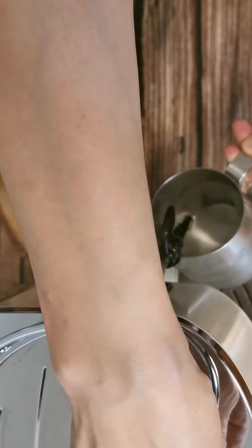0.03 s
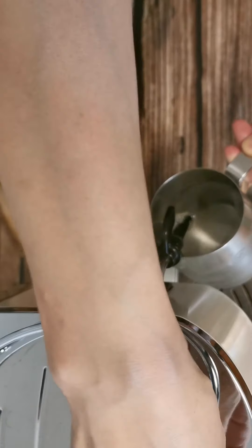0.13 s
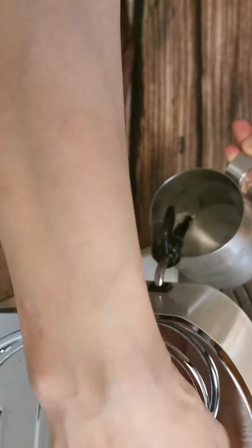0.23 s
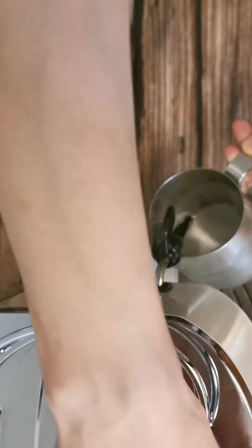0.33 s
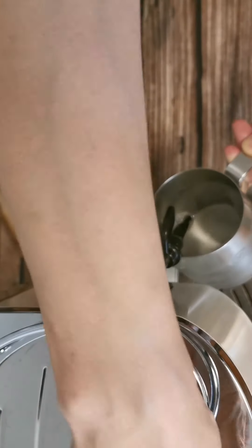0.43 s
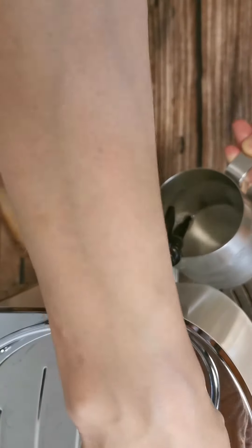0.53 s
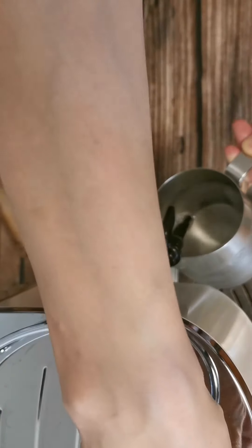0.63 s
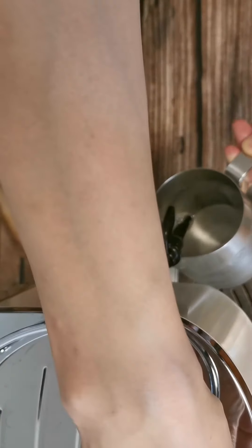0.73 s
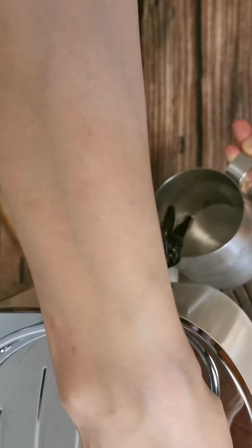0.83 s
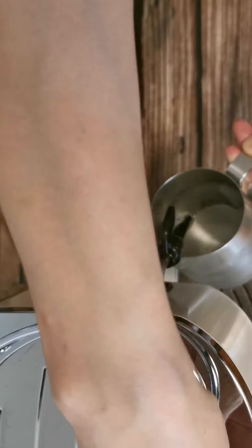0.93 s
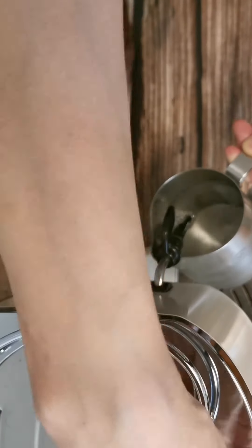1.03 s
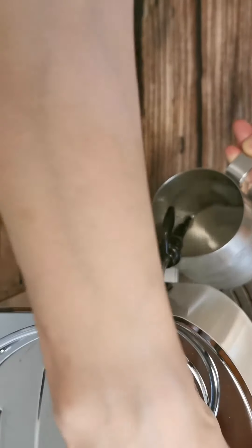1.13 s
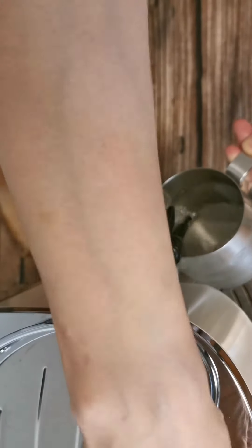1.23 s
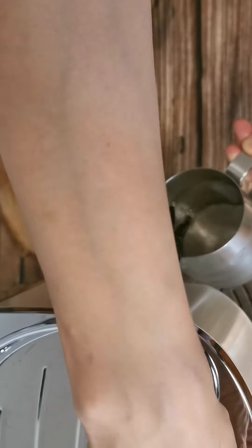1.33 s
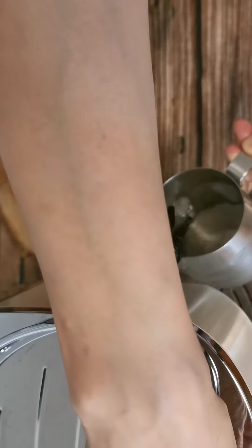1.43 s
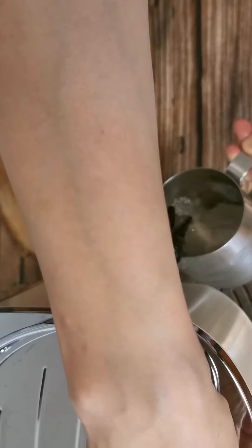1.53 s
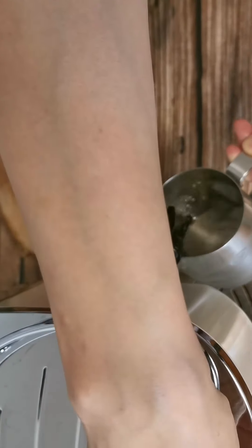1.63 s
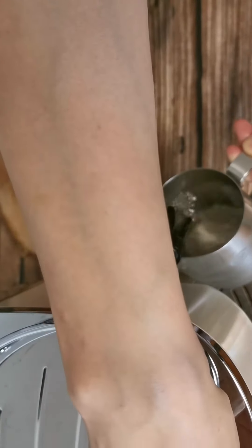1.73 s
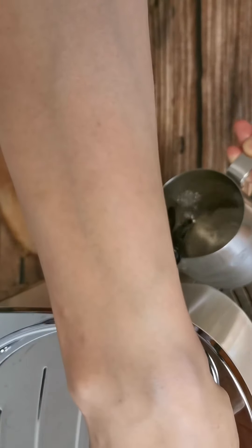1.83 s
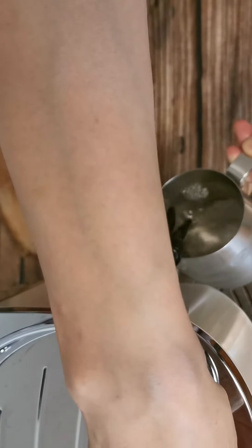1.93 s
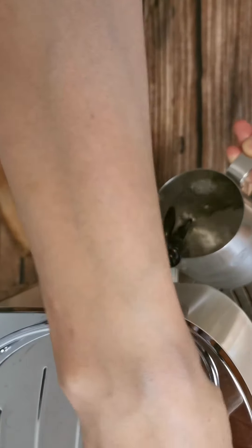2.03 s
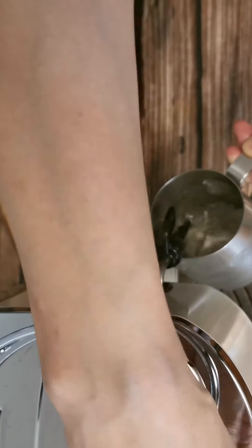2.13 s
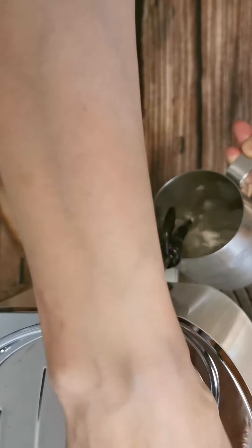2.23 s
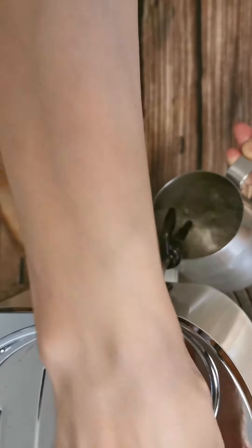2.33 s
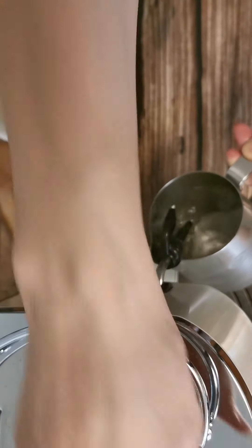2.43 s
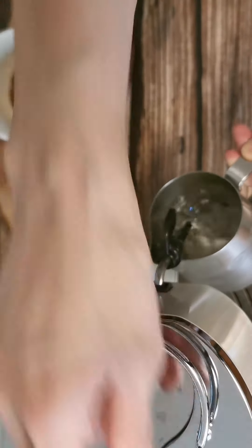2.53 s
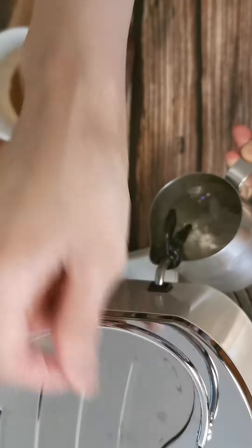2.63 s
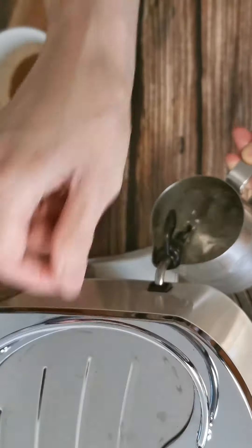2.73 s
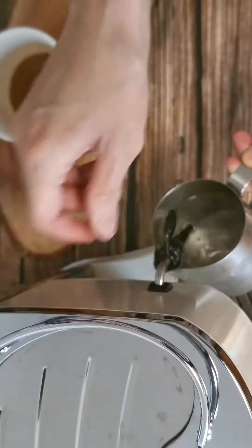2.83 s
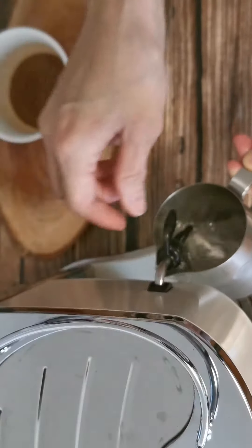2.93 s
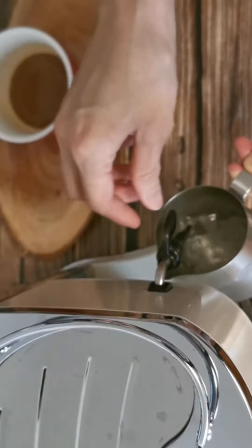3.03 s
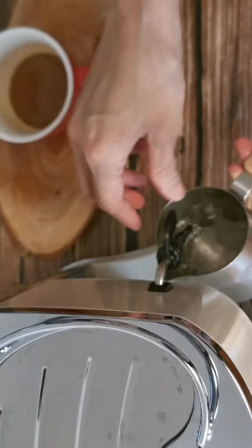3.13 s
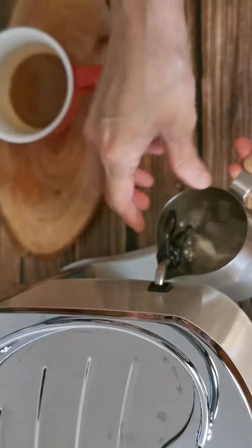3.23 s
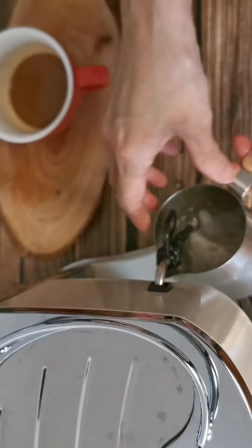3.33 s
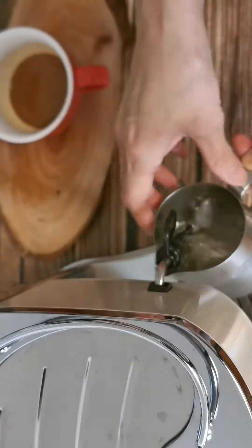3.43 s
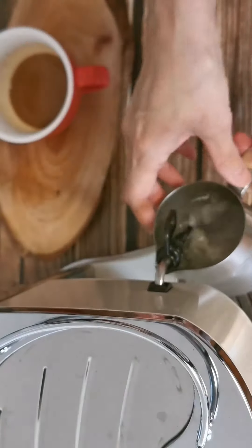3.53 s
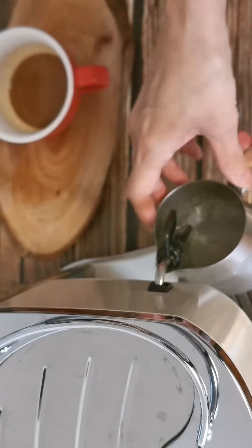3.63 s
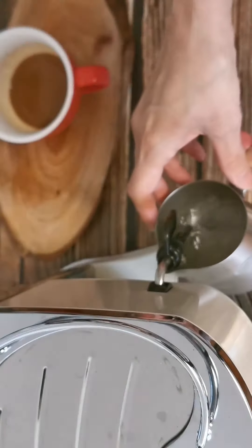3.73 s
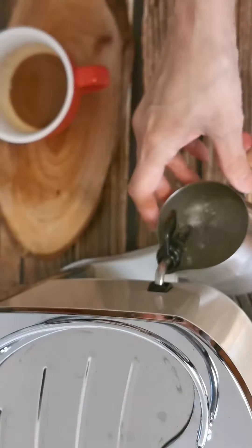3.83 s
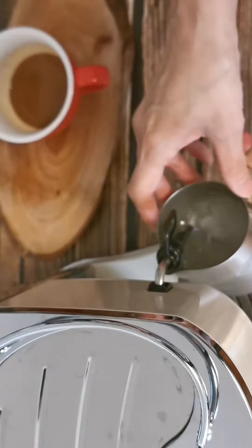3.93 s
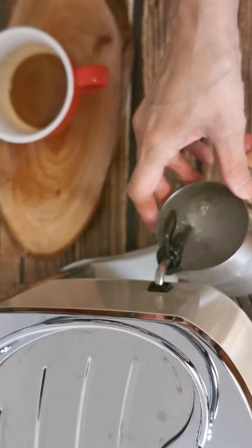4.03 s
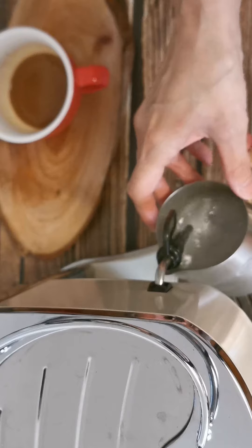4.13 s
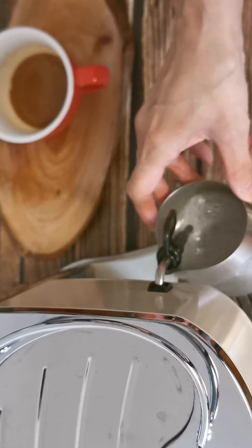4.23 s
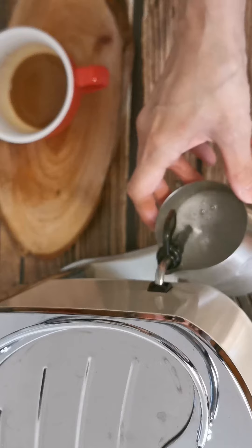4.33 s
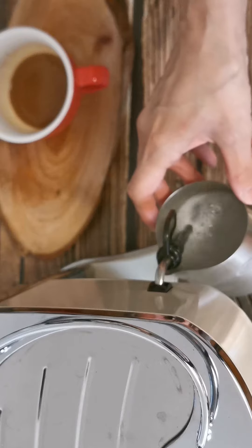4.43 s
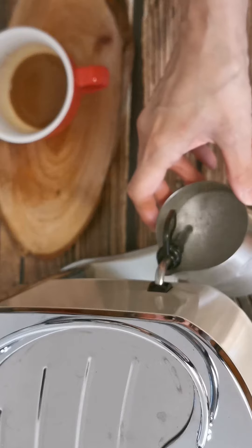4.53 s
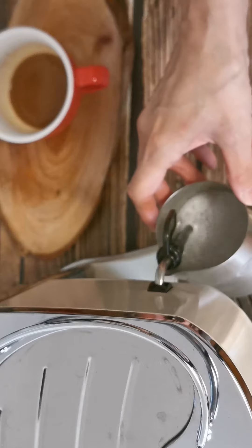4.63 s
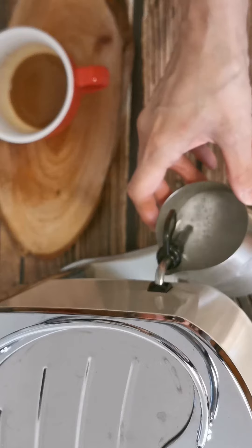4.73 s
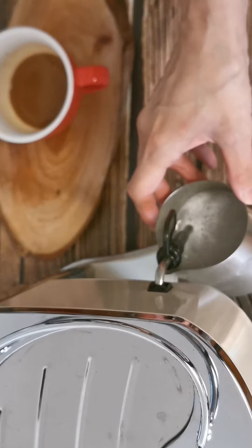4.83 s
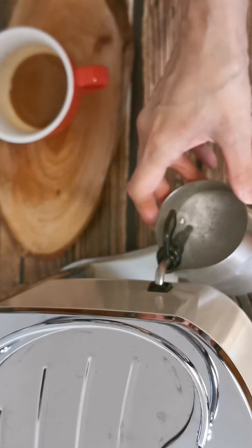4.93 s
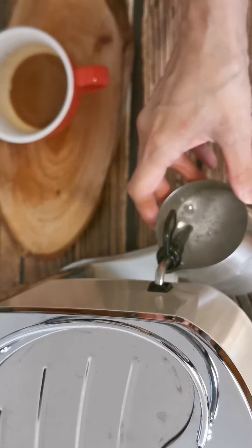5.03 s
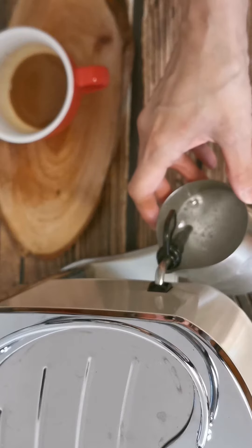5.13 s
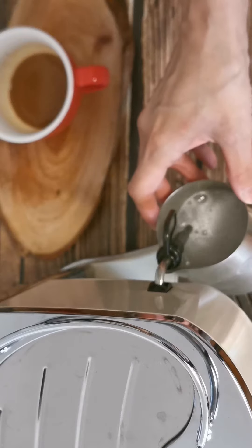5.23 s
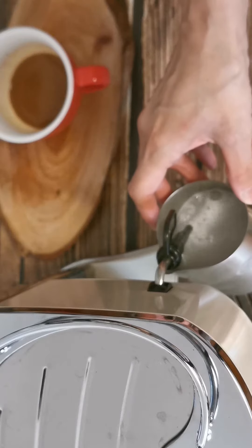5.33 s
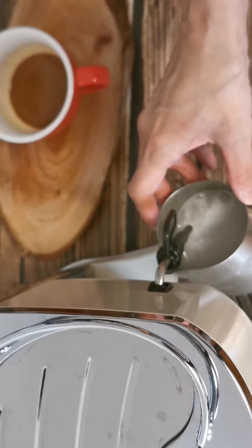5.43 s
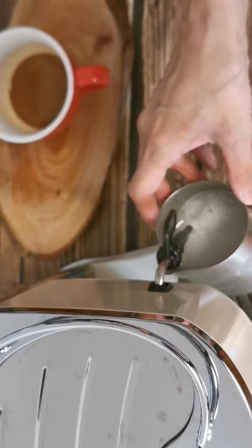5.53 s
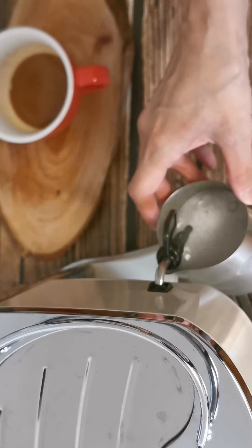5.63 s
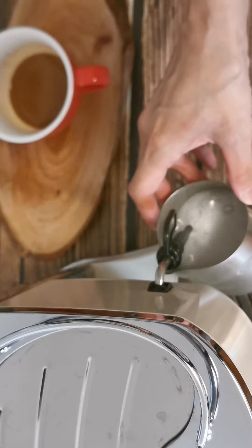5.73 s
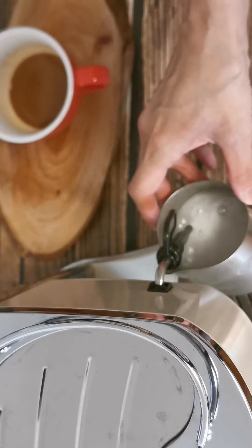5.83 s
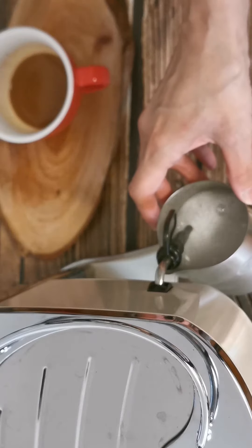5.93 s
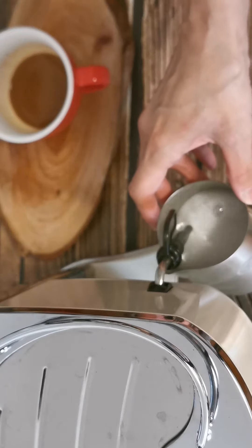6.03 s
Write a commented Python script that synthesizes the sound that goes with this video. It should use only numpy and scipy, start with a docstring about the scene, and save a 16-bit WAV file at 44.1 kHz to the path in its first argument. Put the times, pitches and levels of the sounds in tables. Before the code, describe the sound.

Close stereo sound in a kitchen, with faint low rumble and liquid burble behind. At 0.1 s a steam wand opens into a steel pitcher: a rising gurgle, a sizzle of drops and hollow roaring air until about 1 s, under continuous crackling, metallic-coloured hiss. From 0.4 s a thin squeal climbs, ragged at first, settling near 3 kHz by 2 s and clearest from 2.3 to 3.1 s, with a fuzzy higher whistle. Small bubbles fizz and pop around 1.4-2 s and occasionally later; drops sizzle near 1.9 and 3.3 s. The squeal dies by 3.9 s. From 4 to 4.4 s come gulps, a falling slurp, hollow spits and a brief hoot. At 4.4 s the tip sinks: the hiss dulls beneath a growing boiling rattle, with bright ringing pops densest at 4.9-5.2 s. Around 5.5 s it surfaces abruptly, and fluttering hiss continues with short airy slurps to the end, about 6.1 s.

```python
"""A steam wand blowing into a little liquid in a steel pitcher, miked close by in a kitchen, in stereo.
The jet is crackling noise in the colour of the pitcher; its squeal, noise in a narrow resonance, climbs
as the liquid warms. At the surface the tip gulps air and spits: swept noise and sagging thumps.
Sunk deep, the hiss gives way to the rattle of collapsing steam bubbles: short rings and a broad boil.
Low burble, rumble and faint air lie behind; two microphone ports hear it all with short reflections."""
import sys
import numpy as np
from scipy import signal
from scipy.fft import rfft, irfft
from scipy.io import wavfile
from scipy.ndimage import uniform_filter1d

SR = 44100
rng = np.random.default_rng(int(sys.argv[2]) if len(sys.argv) > 2 else 0)


def master_out(mix):
    """Clip the mix to full scale and print it as 16-bit PCM to the path in sys.argv[1]."""
    frames = np.transpose(np.atleast_2d(mix))
    ceiling = np.clip(frames, -1, 1)
    pcm = np.round(ceiling * 32767).astype(np.int16)
    wavfile.write(sys.argv[1], SR, pcm)


N = 268304
TIME = np.arange(N) / SR
HZ = np.fft.rfftfreq(N, 1 / SR)

VALVE_OPENS = 0.093  # s
HOLLOW_HZ = 1250  # the hollow in the liquid around the tip, at rest
# the tip is sunk deep once: it goes under, stays, and comes up again (s)
DIVE_AT, SINK_S, SURFACES_AT, LIFT_S = 4.42, 0.096, 5.54, 0.06


def gain_of(db):
    """Decibels to a factor."""
    return 10 ** (np.asarray(db) / 20)


def evened(x):
    """Scales to rms 1."""
    return x / np.sqrt(np.mean(x ** 2) + 1e-20)


def read(points, hz):
    """A spectrum table joined by straight lines on a log axis."""
    f, value = np.transpose(points)
    return np.interp(np.log(hz + 1), np.log(f + 1), value)


def follow(rows):
    """The columns of a curve table, sample by sample."""
    s, *columns = np.transpose(rows)
    return [np.interp(TIME, s, c) for c in columns]


def during(rows, fade=0.045):
    """1 over the span of a curve table, fading out beyond it."""
    return np.clip(1 + np.minimum(TIME - rows[0][0], rows[-1][0] - TIME) / fade, 0, 1)


def held(start, end, attack, release):
    """1 from start to end, with a straight rise before and a straight fall after."""
    return np.clip(1 + np.minimum((TIME - start) / attack, (end - TIME) / release), 0, 1)


def burst(s, length):
    """A smooth swell of height 1 around the moment s."""
    return np.exp(-np.minimum((2 * (TIME - s) / length) ** 2, 50))


def coloured(x, db):
    """Filters by a gain in dB on the axis HZ; rms 1."""
    return evened(irfft(rfft(x) * gain_of(db), N))


def above(x, hz):
    """A steep high-pass."""
    return signal.sosfilt(signal.butter(6, hz, "highpass", fs=SR, output="sos"), x)


def wander(rate):
    """Slow chance, up to about rate changes a second; rms 1."""
    return evened(irfft(rfft(rng.standard_normal(N)) / (1 + (HZ / rate) ** 2), N))


def crackle(per_s, spread_db, share):
    """Tiny bursts of uneven size, holding a share of the power, in smooth turbulence."""
    sizes = gain_of(spread_db * np.minimum(rng.exponential(1, N), 5))
    clicks = sizes * rng.choice([-1, 1], N) * (rng.random(N) < per_s / SR)
    share = np.clip(share, 0, 1)
    return np.sqrt(share) * evened(clicks) + np.sqrt(1 - share) * rng.standard_normal(N)


def resonate(x, hz, width):
    """A steep resonance (two equal poles) that follows the pitch hz; rms 1."""
    turn = np.exp(2j * np.pi * np.cumsum(hz * np.ones(len(x))) / SR)
    r = np.exp(-np.pi * width / SR)
    # turn the pitch down to 0 Hz, smooth there, and turn back
    smoothed = signal.lfilter([1], [1, -2 * r, r * r], x / turn)
    return evened((turn * smoothed).real)


def depth():
    """How far the tip is sunk: 0 at the surface, 1 deep."""
    return held(DIVE_AT + SINK_S, SURFACES_AT - LIFT_S, SINK_S, LIFT_S)


# low burble of the liquid, relative spectrum: f/Hz, level/dB
BURBLE_SPECTRUM = [(90, -2), (160, 9), (230, 2), (330, -13), (480, -5.5), (800, -17), (1600, -11.5)]
# the kitchen's low background, relative spectrum: f/Hz, level/dB
ROOM_RUMBLE = [(12, -27), (20, -3.5), (41, 6), (70, -9), (92, 1), (200, -9.5), (260, -87), (440, -120)]
# dips of the rumble and burble: start t/s, end t/s, level change/dB
QUIET_SPELLS = [(0.107, 0.643, -4.5), (2.298, 2.554, -1), (3.152, 4.517, -7), (3.616, 3.67, -24),
                (4.01, 4.4, -6), (4.179, 4.318, -18), (5.952, 5.994, -24)]


def low_sounds(burble_db=-72, deep_db=-65, uneven_db=6.0, rumble_db=-63, swell_db=4.5, air_db=-76):
    """The liquid burbles unevenly, more with the tip deep, over the kitchen's low background and faint air."""
    burble = coloured(crackle(per_s=150, spread_db=-0.5, share=0.17), read(BURBLE_SPECTRUM, HZ))
    swirl = gain_of(burble_db + uneven_db * np.minimum(wander(25), 1.5)) + gain_of(deep_db) * depth()
    rumble = coloured(rng.standard_normal(N), read(ROOM_RUMBLE, HZ))
    rumble = rumble * gain_of(rumble_db + swell_db * wander(19.0))
    air_spectrum = read([(900, -24.0), (2200, 57), (4000, -3), (15000, -71)], HZ)
    air = coloured(rng.standard_normal(N), air_spectrum)
    lull_db = sum(db * held(start, end, attack=0.05, release=0.037) for start, end, db in QUIET_SPELLS)
    return gain_of(lull_db) * (swirl * burble + rumble) + gain_of(air_db) * air


# swirling liquid, each surge swelling and breaking off: start t/s, end t/s, level/dB, centre f/Hz
LIQUID_SURGES = [(0.08, 0.089, -54, 330), (1.825, 1.93, -56.5, 217), (2.627, 2.886, -69.5, 187),
                 (2.93, 3.037, -54.5, 263), (5.258, 5.303, -56.5, 238), (5.63, 5.66, -69, 361.6)]


def surges(swell_s=0.062, stop_s=0.021, glug_db=1.5, slosh=0.18):
    """Now and then the liquid heaves against the wall in a low, lumpy run of glugs."""
    drive = crackle(per_s=130, spread_db=0.5, share=0.8) * gain_of(glug_db * np.minimum(wander(41), 2))
    waver = np.exp(slosh * wander(30))
    out = np.zeros(N)
    for start, end, db, hz in LIQUID_SURGES:
        glugs = resonate(drive, hz * waver, width=80)
        out += gain_of(db) * held(start, end, swell_s, stop_s) * glugs
    return out


def first_gurgle(start_hz=400, climb_octaves_per_s=7.1, s=0.24, length=0.36, level_db=-53, slosh=0.13):
    """The first steam digs a deep hollow, whose pitch climbs as the liquid closes in."""
    hz = np.minimum(start_hz * 2 ** (climb_octaves_per_s * (TIME - VALVE_OPENS)), HOLLOW_HZ)
    gurgle = resonate(rng.standard_normal(N), hz * (1 + slosh * wander(40)), width=260)
    return gain_of(level_db) * burst(s, length) * gurgle * (TIME > VALVE_OPENS)


# drops in the jet, at the tip: centre t/s, length t/s, f/Hz, level/dB
DROP_SIZZLES = [(0.2, 0.037, 6860, -34), (0.28, 0.14, 6850, -50), (1.865, 0.25, 4840, -35),
                (3.295, 0.59, 7350, -38.5), (3.613, 0.18, 6880, -43), (5.858, 0.27, 7700, -39.5)]


def sizzles(width=1000):
    """Drops caught in the jet fizz away as resonant noise, the first of them water left in the wand."""
    drive = rng.standard_normal(N)
    return sum(gain_of(db) * burst(s, length) * resonate(drive, hz, width)
               for s, length, hz, db in DROP_SIZZLES)


# draughts of air pulled in at the surface: start t/s, end t/s, roar level/dB
AIR_DRAUGHTS = [(0.115, 0.292, -39), (0.3, 0.4, -36), (0.41, 0.63, -43.5), (0.653, 1.005, -47.5),
                (3.82, 3.838, -47), (4.017, 4.2, -44), (4.21, 4.33, -44.5), (4.34, 4.42, -51),
                (4.632, 4.69, -44), (5.598, 5.639, -41), (5.77, 5.817, -45.5), (5.895, 5.956, -41.5),
                (6.066, 6.09, -42)]


def draughts(attack=0.026, release=0.022):
    """The strength of the air drawn in at the surface."""
    return np.max([gain_of(db) * held(start, end, attack, release)
                   for start, end, db in AIR_DRAUGHTS], axis=0)


# roar inside the pitcher, relative spectrum: f/Hz, level/dB
ROAR_SPECTRUM = [(200, -45), (400, -29.5), (750, -24), (900, -3.5), (1080, 2.5), (1230, 5.5), (1450, -8),
                 (1900, -39), (2600, -43), (4000, -77)]


def roar():
    """Air drawn in at the surface sounds the pitcher's lowest resonance."""
    air = crackle(per_s=900, spread_db=1.5, share=0.4) * gain_of(1.5 * np.minimum(wander(90), 1.5))
    return coloured(air, read(ROAR_SPECTRUM, HZ)) * draughts()


# slurps as the tip comes clear of the froth: start t/s, end t/s, first f/Hz, last f/Hz, level/dB
FROTH_SLURPS = [(3.978, 4.042, 1670, 840, -44), (4.634, 4.689, 1930, 1600, -46),
                (5.568, 5.6, 1750, 1190, -39), (5.756, 5.782, 1740, 1350, -41),
                (5.89, 5.931, 1600, 1250, -46), (6.054, 6.094, 1900, 1380, -42.5)]


def slurps(swell_s=0.022, fade_s=0.026):
    """A funnel opens in the froth: a soft, broad splutter that falls in pitch as it widens."""
    drive = crackle(per_s=1200, spread_db=1.5, share=0.6)
    out = np.zeros(N)
    for start, end, first_hz, last_hz, db in FROTH_SLURPS:
        hz = np.interp(TIME, [start, end], [first_hz, last_hz])
        out += gain_of(db) * held(start, end, swell_s, fade_s) * resonate(drive, hz, width=1100)
    return above(out, hz=875)


def hoot(start=4.33, end=4.475, level_db=-43.0, hz=1190, swell_s=0.025, fade_s=0.02):
    """Just before the tip goes under, the narrowing hollow holds one note."""
    note = resonate(rng.standard_normal(N), hz, width=90)
    note = evened(note / (abs(signal.hilbert(note)) + 0.3) ** 0.6)  # steadies its strength
    return gain_of(level_db) * held(start, end, swell_s, fade_s) * note


# gulps under the jet: centre t/s, length t/s, lowest f/Hz, level/dB
AIR_GULPS = [(4.075, 0.097, 342, -41), (4.253, 0.1, 496, -50)]
# their bubbling, relative spectrum: f/Hz, level/dB
GULP_SPECTRUM = [(200, -16), (340, -8), (800, 9), (1400, -2), (2000, -12), (3000, -35)]


def gulps(ring_db=-6, ring_s=0.026, glug_db=2.0, edge_hz=130, spread=0.99):
    """The hollow deepens and refills: rough bubbling reaches down to its pitch and rings at the deepest."""
    bubbling = crackle(per_s=500, spread_db=2.0, share=0.56)
    bubbling = bubbling * gain_of(glug_db * np.minimum(wander(80), 1.5))
    hz, t, z = signal.stft(coloured(bubbling, read(GULP_SPECTRUM, HZ)), SR, nperseg=1024)
    out = np.zeros(N)
    for s, length, low_hz, db in AIR_GULPS:
        lowest = np.interp(t, TIME, HOLLOW_HZ * (low_hz / HOLLOW_HZ) ** burst(s, 2 * length))
        passed = np.clip(1 + (hz[:, None] - lowest) / edge_hz, 0, 1)
        rush = signal.istft(z * passed, SR, nperseg=1024)[1][:N]
        ring = gain_of(ring_db) * burst(s, ring_s) * resonate(bubbling, low_hz, width=80)
        out += gain_of(db) * (burst(s, spread * length) * rush + ring)
    return above(out, hz=247)


# the jet leaving the pitcher, relative spectrum: f/Hz, level/dB
JET_SPECTRUM = [(250, -38.5), (600, -56), (780, -25), (950, -3.5), (1600, -1), (2300, 5.5), (4000, 3.5),
                (6100, 2), (7600, 3.5), (9800, 3), (12000, 2.5), (14300, 0), (15600, 1)]
# air resonances of the pitcher, untuned: f/Hz, width/Hz, lift/dB
PITCHER_RESONANCES = [(1180, 160, 7.5), (2600, 640, -10.5), (3188, 205, 9), (4920, 910, 6.5),
                      (7040, 185, 7), (8220, 140, 7.5), (9240, 210, 4.5), (10580, 560, 7),
                      (12060, 540, 2.5), (12700, 300, 5.5), (14200, 300, -2)]


def pitcher_db(hz, tuning=1):
    """The colour of the jet as it leaves the pitcher, whose resonances shift by the factor tuning."""
    lifts = sum(db / (1 + (2 * (hz - centre * tuning) / width) ** 2)
                for centre, width, db in PITCHER_RESONANCES)
    return read(JET_SPECTRUM, hz) + lifts


# spits at the surface: centre t/s, thump level/dB, thump f/Hz, relative spray level/dB, length t/s
SURFACE_SPITS = [(3.653, -76, 1210, -24, 0.019), (3.823, -36, 1167, -21, 0.009),
                 (3.982, -49, 1750, -28, 0.0055), (4.026, -30, 1074, -23, 0.028),
                 (4.067, -32, 1104, -24, 0.0078), (4.122, -36.5, 930, -24.5, 0.021),
                 (4.151, -32.5, 1130, -28, 0.015), (4.189, -26, 1092, -22, 0.0042),
                 (4.2, -38, 1090, -24, 0.013), (4.228, -41, 1090, -24.5, 0.013),
                 (4.27, -32, 1080, -17.5, 0.0025), (4.322, -31.5, 1140, -34, 0.007),
                 (4.379, -37, 1190, -27.5, 0.0098), (4.407, -30.5, 1183, -25, 0.014),
                 (4.419, -33, 1180, -39, 0.008)]


def spits(spray_db=-1, smear=0.69, sag_hz_per_s=7000):
    """The jet breaks the surface: a hollow, splashy thump that sags in pitch, and a puff of spray."""
    spray_colour = pitcher_db(HZ) + read([(2500, -27.5), (9000, -14)], HZ)
    spray = coloured(rng.standard_normal(N), spray_colour)
    splash = 0.35 * above(resonate(rng.standard_normal(N), HOLLOW_HZ, width=800), hz=750)
    drift, out = smear * wander(54), np.zeros(N)
    for s, db, hz, puff_db, length in SURFACE_SPITS:
        cycles = (hz - sag_hz_per_s * (TIME - s) / 2) * (TIME - s)
        thump = np.sqrt(2) * np.sin(2 * np.pi * cycles + drift) + splash
        out += burst(s, length) * (gain_of(db) * thump + gain_of(puff_db + spray_db) * spray)
    return out


# spells of small bubbles under the surface: start t/s, end t/s, build-up t/s, level/dB, nominal f/Hz
BUBBLE_FIZZLES = [(1.39, 1.743, 0.51, -39, 3180), (1.75, 2, 0.037, -37, 3245),
                  (2.758, 3.183, 0.059, -43.5, 3320), (3.454, 3.678, 0.24, -38.5, 3310),
                  (3.755, 3.772, 0.077, -32, 3230), (3.85, 3.94, 0.021, -36, 3290),
                  (4.511, 4.565, 0.016, -36, 3360), (4.763, 4.84, 0.089, -31.5, 3300)]
# the deep boil's rattle, relative spectrum: f/Hz, level/dB
BOIL_SPECTRUM = [(1000, -41.5), (2600, -17), (3100, -15), (3800, -3), (4800, 0), (5500, -1.5), (6200, -9.5),
                 (6850, -4.5), (7500, -14.5), (9000, -15.5), (11000, -41), (16000, -55)]
# brief stalls of the bubbles: centre t/s, length t/s, level change/dB
RATTLE_STALLS = [(4.754, 0.032, -4.5), (4.859, 0.035, -7), (4.954, 0.031, -4), (5.232, 0.013, -3),
                 (5.353, 0.034, -5.5)]


def bubbles(deep_ring_db=-36, peak_ring_db=-34, peak_s=5.12, peak_length=0.48, boil_db=-27.5,
            throb_db=3.0, drift=0.024, build_s=0.26, boil_stop_s=0.017, swelling=0.053):
    """Steam bubbles collapse under the surface: short rings, and a broad rattle while the tip is deep."""
    # at the deepest the bubbles grow and ring lower
    size = 1 + drift * wander(30) + swelling * burst(5.17, length=0.22)
    collapses = crackle(per_s=570, spread_db=0.7, share=0.5)
    fizzles = np.zeros(N)
    for start, end, build, db, hz in BUBBLE_FIZZLES:
        spell = held(start, end, build, release=0.088)
        fizzles += gain_of(db) * spell * resonate(collapses, hz / size, width=300)
    rings = resonate(collapses, 3270 / size, width=314)
    deep = depth() * held(DIVE_AT + SINK_S + build_s / 2, SURFACES_AT, build_s / 2, LIFT_S)
    ringing = gain_of(deep_ring_db) * deep + gain_of(peak_ring_db) * burst(peak_s, peak_length)
    rattle = coloured(crackle(per_s=3600, spread_db=3.0, share=0.47), read(BOIL_SPECTRUM, HZ))
    boiling = held(DIVE_AT + SINK_S / 2 + build_s, SURFACES_AT - LIFT_S, build_s, boil_stop_s)
    boiling = gain_of(boil_db) * boiling
    stall_db = sum(db * burst(s, length) for s, length, db in RATTLE_STALLS)
    unsteady = gain_of(stall_db + throb_db * np.minimum(wander(156), 2))
    return (fizzles + rings * ringing + rattle * boiling) * unsteady


# large bubbles and short sputters collapsing: centre t/s, level/dB, f/Hz, length t/s
BUBBLE_POPS = [(1.753, -29, 3110, 0.016), (1.931, -25, 3070, 0.0055), (1.948, -21, 3160, 0.0074),
               (1.957, -25, 3005, 0.0077), (2.331, -34, 3090, 0.017), (2.808, -32.5, 3550, 0.026),
               (2.867, -35, 3630, 0.026), (2.966, -30, 2925, 0.016), (3.398, -28.5, 3420, 0.024),
               (3.642, -30, 3350, 0.013), (3.78, -28, 3190, 0.011), (4.59, -26, 3355, 0.023),
               (4.883, -20.5, 3290, 0.0086), (4.925, -25, 3280, 0.011), (4.946, -23, 3260, 0.0056),
               (5.001, -20.5, 3280, 0.0079), (5.022, -21, 3220, 0.0079), (5.091, -20, 3170, 0.0084),
               (5.123, -21, 3440, 0.0099), (5.156, -23.5, 3225, 0.013), (5.168, -19.5, 3120, 0.0062),
               (5.392, -41, 3120, 0.0053)]


def pops(smear=0.87, ragged_s=0.067):
    """Each large bubble swells and dies as a short, unsteady ring; the longer ones break up into sputter."""
    drift, out = smear * wander(140), np.zeros(N)
    sputter = resonate(rng.standard_normal(N), 3300, width=750)
    for s, db, hz, length in BUBBLE_POPS:
        ragged = np.clip(length / ragged_s, 0, 0.8)
        tone = np.sin(2 * np.pi * hz * TIME + drift)
        ring = np.sqrt(2 * (1 - ragged)) * tone + np.sqrt(ragged) * sputter
        out += gain_of(db) * burst(s, length) * ring
    return out


# upper whistle of the steam pocket at the tip: t/s, mean f/Hz, level/dB, overtone level/dB
WHISTLE_PATH = [(0.3, 4300, -57, -70), (0.63, 4700, -58, -66), (0.8, 4980, -40, -60),
                (0.98, 4870, -41, -65), (1.12, 5230, -43, -53), (1.27, 5290, -43, -44),
                (1.52, 5620, -38, -39), (1.86, 5520, -39.5, -43.5), (2.02, 5685, -40.5, -40),
                (2.66, 5656, -41, -38.5), (3.0, 5630, -40.5, -38), (3.3, 5700, -42.5, -35),
                (3.56, 5790, -42, -35.5), (3.79, 5870, -44, -41)]


def whistle(top_db=-4, waver=0.0079):
    """The higher resonances of the steam pocket: a fuzzy whistle with two overtones."""
    hz, db, overtones_db = follow(WHISTLE_PATH)
    hz = hz * (1 + waver * wander(11))
    drive = crackle(per_s=1200, spread_db=2.5, share=0.58)
    lowest = resonate(drive, hz, width=280)
    overtones = resonate(drive, hz * 1.474, width=300)
    overtones = overtones + gain_of(top_db) * resonate(drive, hz * 1.96, width=640)
    mix = gain_of(db) * lowest + gain_of(overtones_db) * overtones
    return during(WHISTLE_PATH, fade=0.086) * mix


# squeal of the steam pocket at the tip, climbing as the liquid warms: t/s, mean f/Hz, level/dB
SQUEAL_PATH = [(0.3, 1510, -51.5), (0.42, 1930, -52), (0.5, 2070, -44), (0.66, 2250, -51.5),
               (0.78, 2560, -45), (0.87, 2540, -44), (0.96, 2430, -48), (1.05, 2570, -42),
               (1.14, 2640, -40), (1.28, 2770, -41), (1.47, 2890, -36), (1.64, 2910, -38),
               (1.84, 2780, -36), (2.0, 2946, -32.5), (2.22, 2930, -36), (2.36, 2930, -31),
               (2.48, 2920, -34.5), (2.57, 2920, -33), (2.73, 2936, -30.5), (2.8, 2950, -36.5),
               (2.95, 2950, -33.5), (3.16, 2920, -35), (3.28, 2940, -38), (3.56, 2950, -35.5),
               (3.79, 2990, -45)]
# how much of the squeal is one clear line: t/s, share/0-1
SQUEAL_CLEARNESS = [(0.4, .5), (0.8, .72), (1.15, .75), (1.4, .45), (2.05, .45), (2.3, .9), (3.15, .9),
                    (3.35, .5)]


def squeal(skirt_db=-11, falter_db=1.3, rough_hz=260):
    """Collapsing bubbles ring the steam pocket: a narrow note, ragged at times, over a broad skirt."""
    hz, db = follow(SQUEAL_PATH)
    hz = hz * (1 + 0.002 * wander(19))
    note = resonate(rng.standard_normal(N), hz, width=85)
    # the ring feeds back on the collapses, which steadies its strength
    note = evened(note / (abs(signal.hilbert(note)) + 0.2) ** 0.75)
    ragged = resonate(crackle(per_s=430, spread_db=-1.5, share=0.36), hz, rough_hz)
    clear = follow(SQUEAL_CLEARNESS)[0]
    mixed = np.sqrt(clear) * note + np.sqrt(1 - clear) * ragged
    note = evened(mixed * gain_of(falter_db * wander(25)))
    skirt = gain_of(skirt_db) * resonate(rng.standard_normal(N), hz * 0.878, width=390)
    return during(SQUEAL_PATH, fade=0.15) * gain_of(db) * (note + skirt)


# fine spray, growing as the tip nears the surface: t/s, relative level/dB
SPRAY_LEVEL = [(0.11, -40), (0.17, -47.5), (0.21, -37.5), (0.31, -32), (0.5, -39.5), (1.1, -37.5),
               (1.4, -34.5), (1.66, -35), (1.98, -39), (2.42, -31), (2.66, -35.5), (3.25, -32),
               (3.55, -28.5), (3.92, -29.5), (4.03, -25.5), (4.3, -27), (5.6, -27.5), (6.08, -29)]
# waves over the tip, mostly choking the spray and churning the body:
# centre t/s, length t/s, spray level change/dB, body level change/dB
WAVE_CHOKES = [(2.01, 0.028, 2, 4), (2.125, 0.038, 2, 4.5), (2.64, 0.12, -2, 3.5), (3.798, 0.015, -6, -2),
               (4.172, 0.046, -6, -1.5), (4.364, 0.072, -11, -5), (4.675, 0.047, 5, 9.5),
               (4.79, 0.06, -11, -7), (5.738, 0.15, -10, 3.5), (6.037, 0.091, -6.5, 4)]


def jet_levels(spray_lift_db=2.0, dive_muffles_db=-13, refill_db_per_s=8,
               body_start_db=-30, body_fades_at=1.85, body_fade_db_per_s=3.5, body_end_db=-34):
    """Spray and body in dB: warmth softens the body, liquid over the tip muffles the spray."""
    # the muffling eases towards the moment the tip surfaces
    muffling = dive_muffles_db - refill_db_per_s * (SURFACES_AT - TIME)
    spray = follow(SPRAY_LEVEL)[0] + spray_lift_db + depth() * muffling
    fade_db = body_fade_db_per_s * np.maximum(TIME - body_fades_at, 0)
    body = np.maximum(body_start_db - fade_db, body_end_db)
    for s, length, spray_db, body_db in WAVE_CHOKES:
        spray = spray + spray_db * burst(s, length)
        body = body + body_db * burst(s, length)
    return spray, body


LOW_HISS_HZ = 900
HAND_CLOSES_AT = 3.9  # s
HAND_DIP_HZ, HAND_DIP_WIDTH_HZ, HAND_DIP_DB = 2610, 510, -9
DARKER_ABOVE_HZ, DARKER_DB_PER_KHZ = 11400, -3
# change of the hiss below LOW_HISS_HZ: t/s, level/dB
LOW_HISS_LEVEL = [(0.6, 16), (1.2, 9), (1.9, 15), (2.4, 2), (3.4, -14), (3.65, -20), (4.0, -16), (4.5, 11)]


def jet(spray, body, body_hz=1900, spray_hz=12000, flutter_db=1.29, patchy_db=2.5, sway=0.0063):
    """Crackling hiss whose colour tilts between churning body and fine spray, in drifting patches."""
    restless = np.interp(TIME, [2.0, 3.8], [0.8, 1.4])  # the jet flutters more as the froth builds
    drive = crackle(per_s=5000, spread_db=0.5, share=0.56)
    drive = drive * gain_of(flutter_db * restless * np.minimum(wander(30), 2))
    hz, t, z = signal.stft(coloured(drive, pitcher_db(HZ)), SR, nperseg=512)
    hz = hz[:, None]
    height = np.clip((hz - body_hz) / (spray_hz - body_hz), 0, 1.25)
    tilt = height * np.interp(t, TIME, spray) + (1 - height) * np.interp(t, TIME, body)
    # the hand round the pitcher hollows the hiss
    dip = HAND_DIP_DB / (1 + (2 * (hz - HAND_DIP_HZ) / HAND_DIP_WIDTH_HZ) ** 2)
    tilt = tilt + dip * (t > HAND_CLOSES_AT)
    # the very top is darker during the dive
    khz_above = np.maximum(hz - DARKER_ABOVE_HZ, 0) / 1000
    tilt = tilt + np.interp(t, TIME, depth()) ** 6 * DARKER_DB_PER_KHZ * khz_above
    low_share = np.clip((LOW_HISS_HZ - hz) / 150, 0, 1)
    tilt = tilt + np.interp(t, *np.transpose(LOW_HISS_LEVEL)) * low_share
    # the pitcher sways in the hand, which shifts its resonances
    tuning = 1 + sway * np.interp(t, TIME, wander(1.0))
    tilt = tilt + pitcher_db(hz, tuning) - pitcher_db(hz)
    # the sloshing surface keeps changing the colour a little
    patches = uniform_filter1d(rng.standard_normal(z.shape), size=4, axis=0)
    patches = evened(uniform_filter1d(patches, size=12, axis=1))
    shaped = z * gain_of(tilt + patchy_db * np.minimum(patches, 2))
    hiss = signal.istft(shaped, SR, nperseg=512)[1][:N]
    return hiss * np.clip((TIME - VALVE_OPENS) / 0.013, 0, 1)


# close direct sound at the two microphone ports, before scaling by nearness: f/Hz, share/0-1
DIRECT_SHARE = [(100, .96), (300, .9), (700, .55), (1150, .82), (1900, .84), (2600, .62), (3300, .8),
                (5200, .66), (6200, .5), (7600, .9), (8500, .7), (11000, .92), (12800, .92), (14000, .7)]
# phase by which the left port leads: f/Hz, lead/radians
LEFT_LEAD = [(300, 0), (720, -.7), (950, .8), (1320, 1.7), (1650, .2), (2100, .3), (3000, 1.1), (3600, .9),
             (4100, 2), (5500, 2.5), (6100, 1.7), (6500, 0)]
# left minus right port: f/Hz, level/dB
PORT_BALANCE = [(200, -0.5), (550, -4.5), (880, -16), (1200, -5.5), (1450, 2.5), (2400, -8), (3200, 0),
                (4500, -1), (6200, -2.5), (6800, -2), (9200, 0), (10300, -3.5), (11600, -4.5), (12800, -3),
                (13900, 6), (15500, -31)]


def ports(x, t60=0.12, near=0.89):
    """Direct sound reaches the two ports out of step; short reflections differ at each."""
    decay = gain_of(-60 * np.minimum(TIME / t60, 10)) * (TIME > .001)
    echoes = rng.standard_normal((2, N)) * decay
    echoes = rfft(echoes / np.linalg.norm(echoes, axis=1, keepdims=True))
    side = np.array([[.5], [-.5]])
    direct = np.clip(near * read(DIRECT_SHARE, HZ), 0, 1)
    paths = np.sqrt(direct) * np.exp(1j * side * read(LEFT_LEAD, HZ)) + np.sqrt(1 - direct) * echoes
    balance = gain_of(side * read(PORT_BALANCE, HZ))
    taps = irfft(paths * balance / np.sqrt(np.mean(balance ** 2, axis=0)), N)
    early = 256  # samples kept before time zero, for the port that leads
    taps = np.roll(taps, early, axis=1)[:, :SR // 2]
    return signal.fftconvolve(x[None], taps, axes=1)[:, early:early + N]


def kitchen(x):
    """The short reflections change slowly: three random sets, crossfaded."""
    centres = [1.0, 3.0, 4.6]  # s, when each set is heard alone
    return sum(ports(x * np.interp(TIME, centres, weights)) for weights in np.eye(len(centres)))


def scene(spray_pan_db=1.0, bubble_pan_db=2.2, squeal_pan_db=-0.5, gulp_pan_db=4, spread_db=-14):
    """All sounds from the pitcher, each group from its own spot; the squeal comes straight out of its mouth."""
    side = np.array([[.5], [-.5]])
    levels = jet_levels()
    background = low_sounds() + surges()
    breaking = first_gurgle() + sizzles() + roar() + slurps() + hoot() + spits()
    surface = kitchen(background + breaking + jet(*levels))
    gulping = ports(gulps())
    depths = kitchen(bubbles() + pops())
    note = ports(whistle() + squeal(), near=1.3)
    scattered = 2 * side * gain_of(spread_db) * jet(*levels)  # spray all round the rim widens the hiss
    return (surface * gain_of(side * spray_pan_db)
            + gulping * gain_of(side * gulp_pan_db)
            + depths * gain_of(side * bubble_pan_db)
            + note * gain_of(side * squeal_pan_db)
            + scattered)


EDGE_HZ = 15830


def record(dry):
    """The recorder's band limit: a steep low-pass at EDGE_HZ."""
    low_pass = signal.firwin(511, EDGE_HZ, window=("kaiser", 9), fs=SR)
    return signal.oaconvolve(dry, low_pass[None], "same")


dry = scene()
out = record(dry)
master_out(out)
```